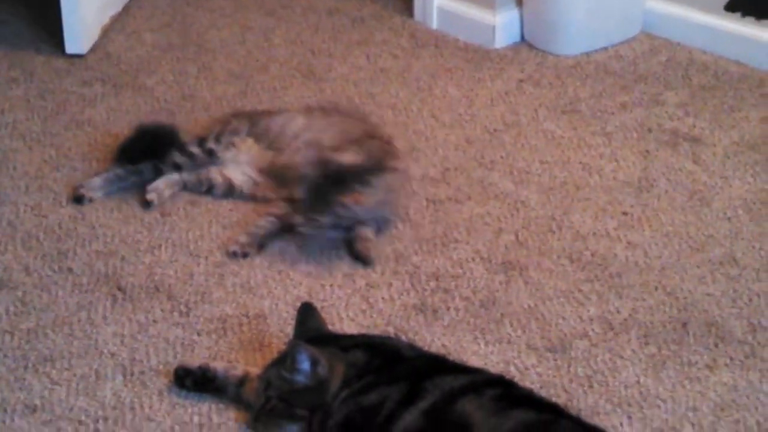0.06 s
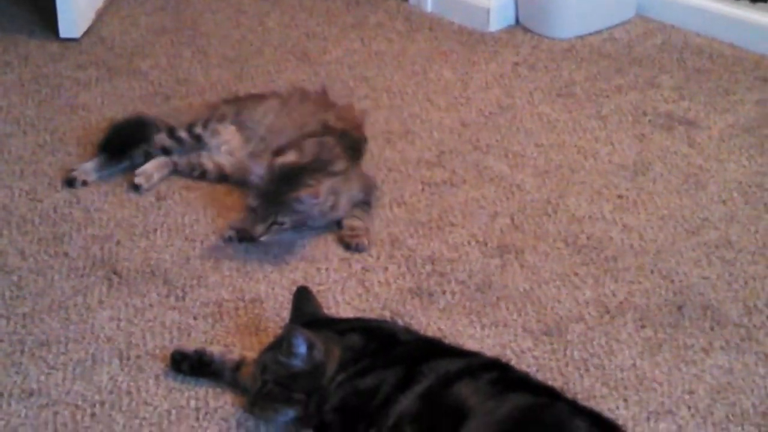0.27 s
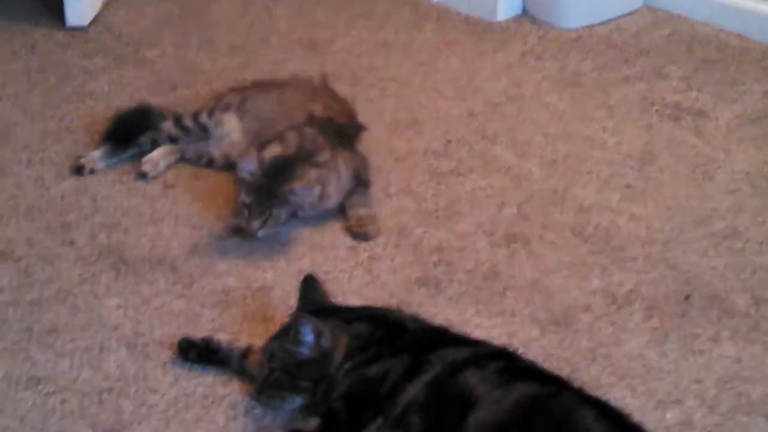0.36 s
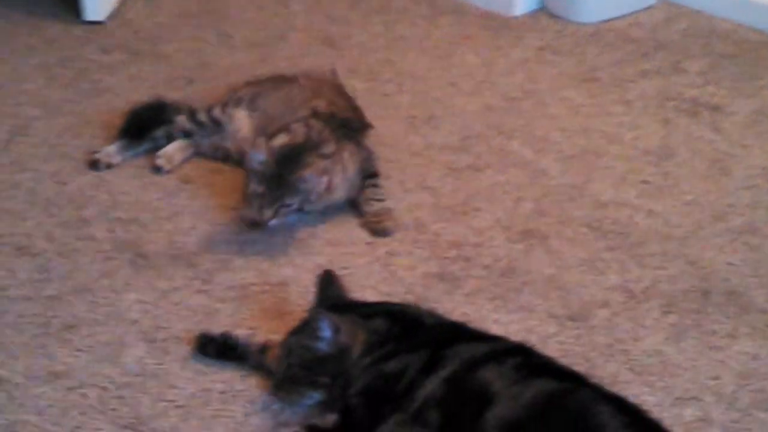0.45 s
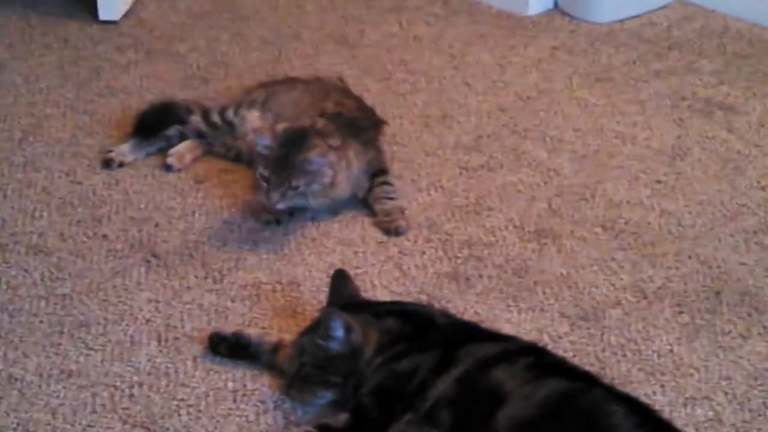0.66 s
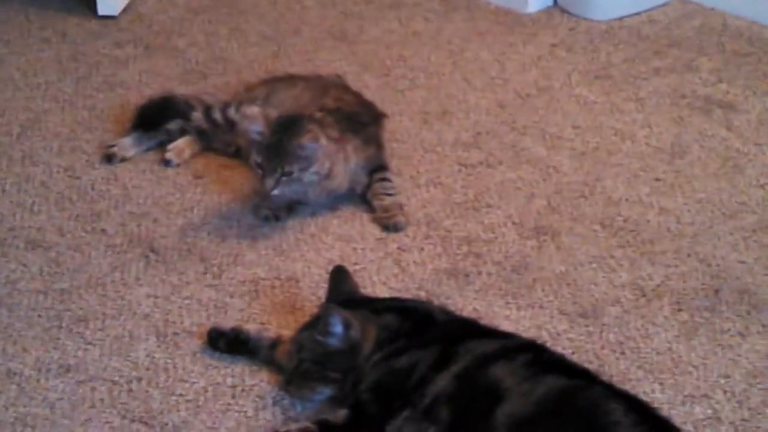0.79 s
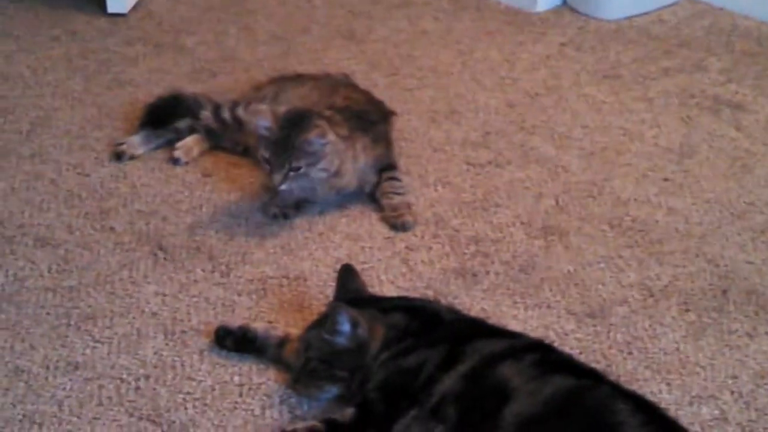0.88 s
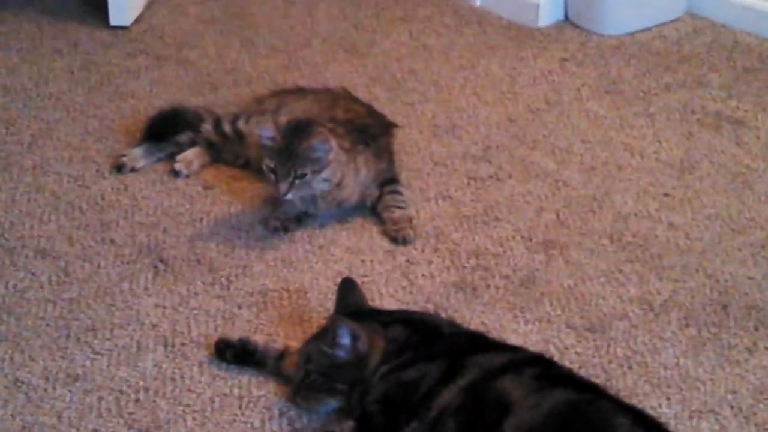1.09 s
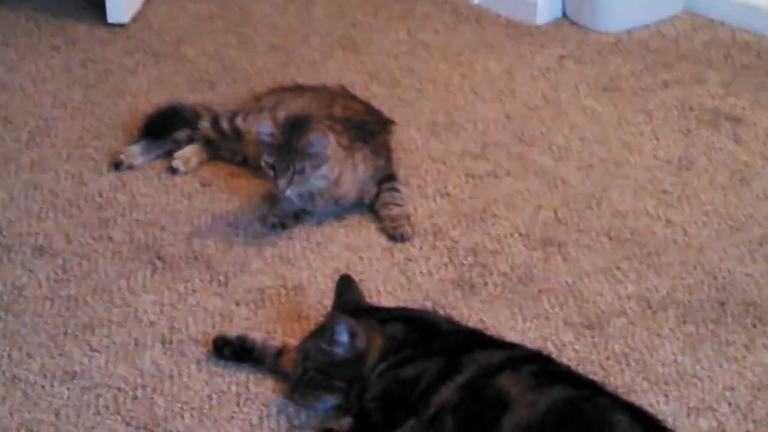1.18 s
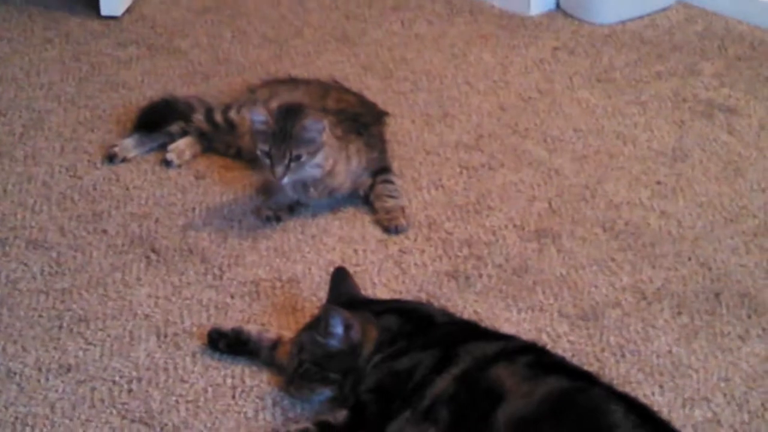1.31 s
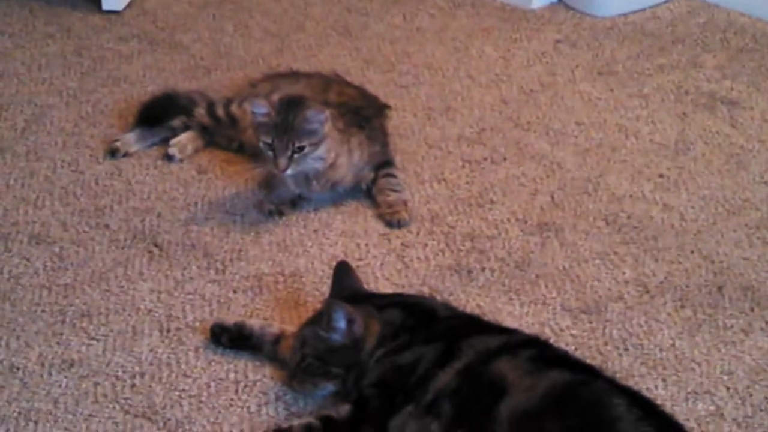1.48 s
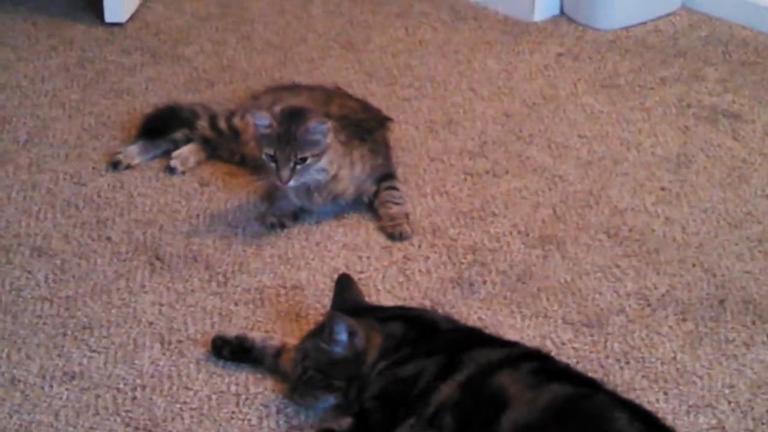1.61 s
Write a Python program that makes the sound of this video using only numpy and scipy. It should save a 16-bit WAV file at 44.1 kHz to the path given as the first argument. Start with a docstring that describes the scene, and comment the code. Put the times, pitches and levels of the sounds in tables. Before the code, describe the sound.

A cat gives a single soft, cooing trill from about 0.2 to 0.8 seconds, a rapidly fluttering tone that is loudest near 0.4 seconds and then fades. A faint tick and two soft, low bumps on the microphone follow at around 1 to 1.1 seconds. A steady rush of ventilation and a low electrical hum fill the small room throughout.

```python
"""You hear a steady rush of ventilation and mains hum, and almost at once a cat's short cooing trill.
The cat lies on a carpet in a small room, mouth closed. Its soft tone flutters some 35 times a second,
growing louder and lower with every beat. A faint tick and two soft bumps on the camera follow.
The camera widens the stereo sound."""
import sys
import numpy as np
from scipy import signal
from scipy.fft import rfft, irfft, next_fast_len
from scipy.io import wavfile
from scipy.ndimage import map_coordinates

SR = 44100
rng = np.random.default_rng(int(sys.argv[2]) if len(sys.argv) > 2 else 0)


def file_out(sig):
    """Save sig as 16-bit WAV at sys.argv[1]."""
    # one column per channel
    cols = np.atleast_2d(sig).T
    # limit, then scale
    lim = np.clip(cols, -1, 1)
    pcm = np.round(lim * 32767).astype(np.int16)
    wavfile.write(sys.argv[1], SR, pcm)


N = 72765

# Tone colour of the rushing air: frequency_hz, relative_db
AIR_COLOUR = [(22, -17), (38, -1.5), (60, -1.5), (95, 0), (160, -5.5), (220, -2.5), (350, -6.5), (600, -16),
              (1000, -23), (1600, -26.5), (3000, -30), (5000, -33), (8000, -38.5), (10500, -53.5),
              (13000, -45), (15000, -45.5)]
# The tones in the hum: pitch_hz, left_db, right_db
HUM_TONES = [(63.1, -47.5, -46.5), (67.3, -56.5, -53), (119, -55, -53), (220.7, -70.5, -61),
             (1132, -99, -72.5)]
# Tone colour of the tick: frequency_hz, relative_db
TICK_COLOUR = [(2000, 5.5), (7000, -6.5), (10000, -11), (15000, -21.5)]
# Bumps on the camera: start_s, left_db, right_db, pitch_hz
CAMERA_BUMPS = [(.962, -44, -41, 60), (1.088, -38, -55, 80)]
# The cat's pitch between beats: time_s, pitch_hz
VOICE_PITCH = [(.19, 766.7), (.225, 773.7), (.26, 693), (.335, 701.4), (.40, 674.2), (.46, 710.2),
               (.51, 731), (.57, 772.2), (.66, 776), (.74, 758.4), (.81, 749)]
# How hard the cat pushes its voice: time_s, relative_db
VOICE_EFFORT = [(.175, -68), (0.193, -46), (0.214, -40), (.26, -35.5), (.30, -38.5), (.37, -29),
                (0.424, -31.5), (.50, -38), (0.599, -35.5), (.69, -40.5), (.755, -44), (.805, -53.5),
                (.83, -57)]
# Speed of the flutter and how far each beat lowers the pitch: time_s, beats_per_s, dip_fraction
VOICE_FLUTTER = [(0.194, 40, 0.018), (.21, 43, 0.21), (0.238, 32.3, 0.14), (.335, 36.1, 0.1386),
                 (0.361, 59, 0.113), (.385, 32.8, 0.1133), (0.451, 28.6, 0.144), (.497, 52, 0.18),
                 (0.546, 40, 0.18), (0.596, 54, .24), (0.656, 32, 0.18), (0.712, 37.3, 0.3),
                 (0.789, 35, 0.077)]
# The overtone an octave above the tone, strongest at the start: time_s, relative_db
VOICE_OVERTONE = [(.19, -7), (.225, -22), (0.269, -17), (.33, -16), (.41, -18.5), (.48, -15), (.57, -22.5),
                  (.75, -24)]
# Tone colour of air swirling in the throat: frequency_hz, relative_db
RASP_COLOUR = [(300, -18), (480, 2), (700, -3.5), (880, -15), (1130, -4), (1350, -16.5), (1550, -12.5),
               (1750, -17), (2100, -27.5), (4000, -47)]
# Echoes from two near walls: delay_s, gain
WALL_ECHOES = [(.005, 0.17), (.0148, 0.52)]


def amp(db):
    """Turn decibels into a number to multiply by."""
    return 10 ** (np.asarray(db) / 20)


def curves(rows):
    """Join a table's points with lines: one curve for each column after the time."""
    times, *columns = np.transpose(rows)
    return [np.interp(np.arange(N) / SR, times, column) for column in columns]


def wobble(per_s):
    """A smooth curve through per_s random points a second."""
    return map_coordinates(rng.standard_normal(size=1024), [np.arange(N) * per_s / SR], mode="wrap")


def filtered(x, response):
    """Multiply each frequency in x by response(hz)."""
    size = next_fast_len(N + SR // 2)
    return irfft(rfft(x, size) * response(np.fft.rfftfreq(size, 1 / SR)), size)[..., :N]


def delayed(x, seconds):
    """The same sound a little later."""
    return filtered(x, lambda hz: np.exp(-2j * np.pi * hz * seconds))


def noise(colour):
    """Noise with the given tone colour and an average power of 1."""
    points_hz, db = np.transpose(colour)
    white = rng.standard_normal(N)
    shaped = filtered(white, lambda hz: amp(np.interp(np.log(hz + 1), np.log(points_hz), db)))
    return shaped / np.sqrt(np.mean(shaped ** 2) + 1e-20)


def stereo(three, shared):
    """Make left and right from three noises; both sides share the first."""
    return np.sqrt(shared) * three[0] + np.sqrt(1 - shared) * np.asarray(three[1:])


def ventilation(left_db=-52.5, right_db=-44.5):
    """Moving air makes a steady rush, partly the same at both microphones."""
    air = stereo([noise(AIR_COLOUR) for _ in range(3)], shared=.21)
    return amp([[left_db], [right_db]]) * air


def hum(waver_db=1.5, drift_rad=.3):
    """Mains power and motors hum with gently wavering tones."""
    t = np.arange(N) / SR
    out = np.zeros((2, N))
    for hz, left_db, right_db in HUM_TONES:
        waver = amp(waver_db * wobble(per_s=6))
        tone = np.sqrt(2) * np.sin(2 * np.pi * hz * t + drift_rad * wobble(per_s=6))
        out += amp([[left_db], [right_db]]) * waver * tone
    return out


def tick(start_s=.9607, level_db=-42, fade_s=.002):
    """A faint burst of noise that drops 60 dB in fade_s."""
    age = np.arange(N) / SR - start_s
    fade = (age > 0) * amp(level_db - 60 * abs(age) / fade_s)
    return fade * np.array([noise(TICK_COLOUR), noise(TICK_COLOUR)])


def bumps(fade_s=.09):
    """Each soft bump on the camera is a low tone that dies away quickly."""
    out = np.zeros((2, N))
    for start_s, left_db, right_db, hz in CAMERA_BUMPS:
        age = np.maximum(np.arange(N) / SR - start_s, 0)
        fade = amp(-60 * age / fade_s)
        out += amp([[left_db], [right_db]]) * fade * np.sin(2 * np.pi * hz * age)
    return out


def room(sound, tail_db=-7.5, fade_s=.17, gap_s=.007):
    """Sound arrives directly, off two near walls, and as a short tail of blurred echoes."""
    t = np.arange(SR // 2) / SR
    tail = stereo(rng.standard_normal(size=(3, len(t))), shared=.49)
    tail *= amp(-60 * t / fade_s) * (t > gap_s)
    tail /= np.linalg.norm(tail[0])
    blur = signal.fftconvolve(sound[None], tail, axes=1)[:, :N]
    echoes = sum(gain * delayed(sound, delay_s) for delay_s, gain in WALL_ECHOES)
    return sound + echoes + amp(tail_db) * blur


def cat_trill(swing_db=14, shimmer_db=2.14, jitter=.023, rasp_db=-21, strong_beat_s=.397):
    """A nearly pure tone, louder and lower on each beat; air swirling in the throat adds a rasp."""
    t = np.arange(N) / SR
    pitch_hz, = curves(VOICE_PITCH)
    effort_db, = curves(VOICE_EFFORT)
    overtone_db, = curves(VOICE_OVERTONE)
    beats_per_s, dip = curves(VOICE_FLUTTER)
    count = np.cumsum(beats_per_s) / SR
    count -= np.interp(strong_beat_s, t, count)  # centre one beat on this moment
    count += .03 * wobble(per_s=30)  # slightly uneven timing
    beat = (.5 + .5 * np.cos(2 * np.pi * count)) ** 1.7  # the power narrows each beat
    pitch_hz *= 1 - dip * beat ** .65  # a power under 1 makes the dip outlast the swell
    pitch_hz *= 1 + jitter * wobble(per_s=190)  # the voice is a little unsteady
    phase = 2 * np.pi * np.cumsum(pitch_hz) / SR
    swell_db = swing_db * (beat - .5) + shimmer_db * wobble(per_s=190)
    tone = amp(swell_db) * np.sin(phase)
    overtone = amp(overtone_db - .25 * swell_db) * np.sin(2 * phase)  # clearest between beats
    rasp = amp(rasp_db + swell_db) * noise(RASP_COLOUR)
    calling = (t > VOICE_EFFORT[0][0]) & (t < VOICE_EFFORT[-1][0])
    return amp(effort_db) * calling * (tone + overtone + rasp)


def scene():
    """The background sounds, plus the cat in its room."""
    cat = amp([[-6], [-1.5]]) * room(cat_trill())  # louder on the right
    return ventilation() + hum() + tick() + bumps() + cat


def record(dry, crossfeed=.76, delay_s=16 / SR, top_hz=15600):
    """The camera widens the stereo and cuts off the very highest sounds."""
    wide = dry - crossfeed * delayed(dry[::-1], delay_s)  # take a late copy of each side from the other
    return filtered(wide, lambda hz: hz < top_hz)


dry = scene()
out = record(dry)
file_out(out)
```